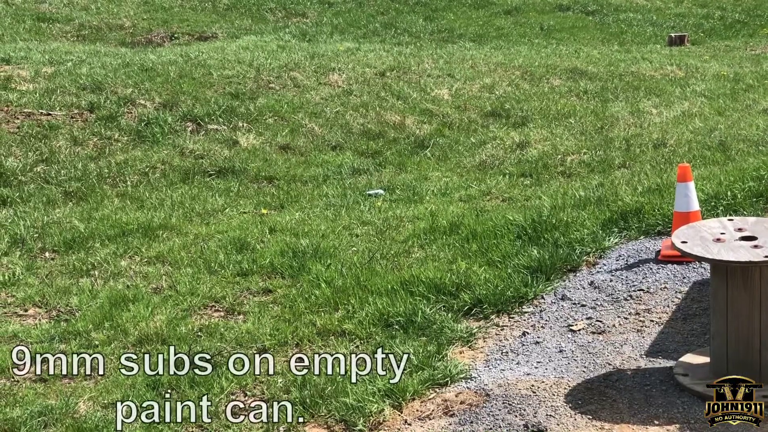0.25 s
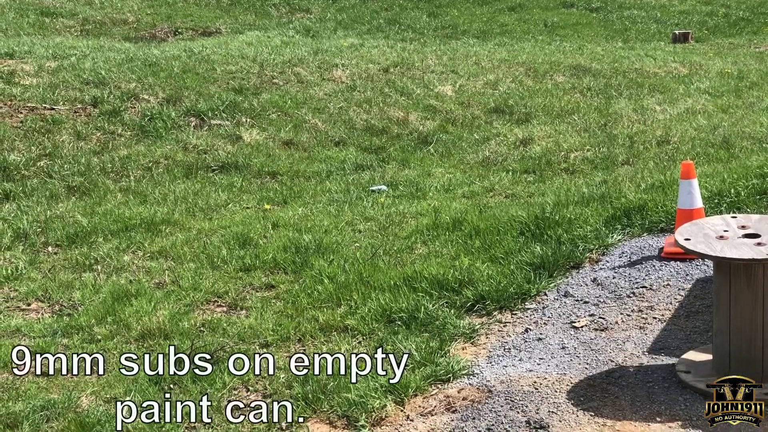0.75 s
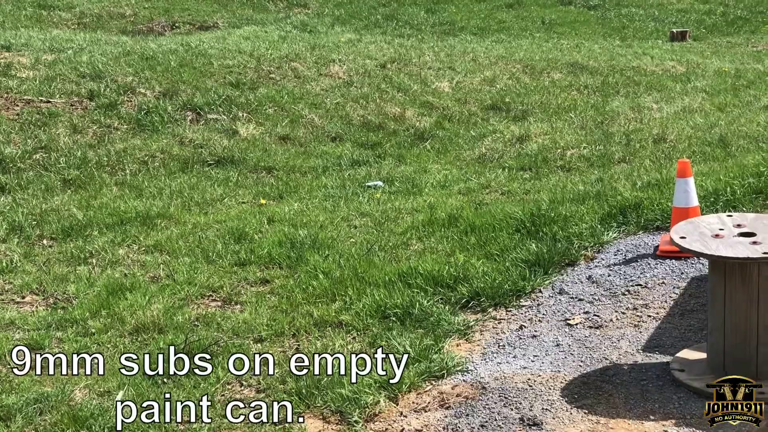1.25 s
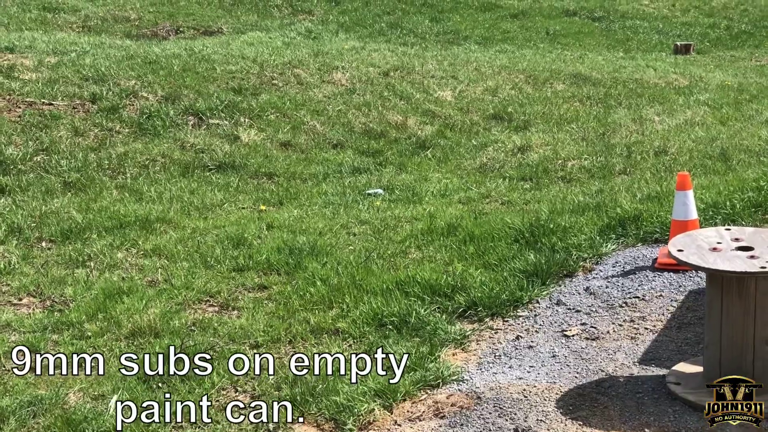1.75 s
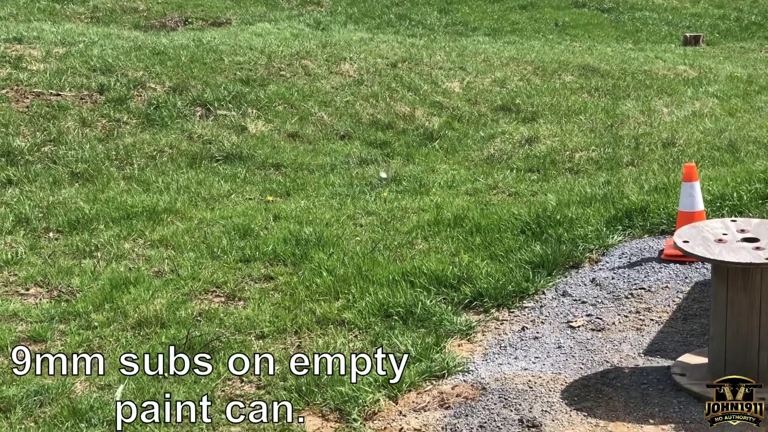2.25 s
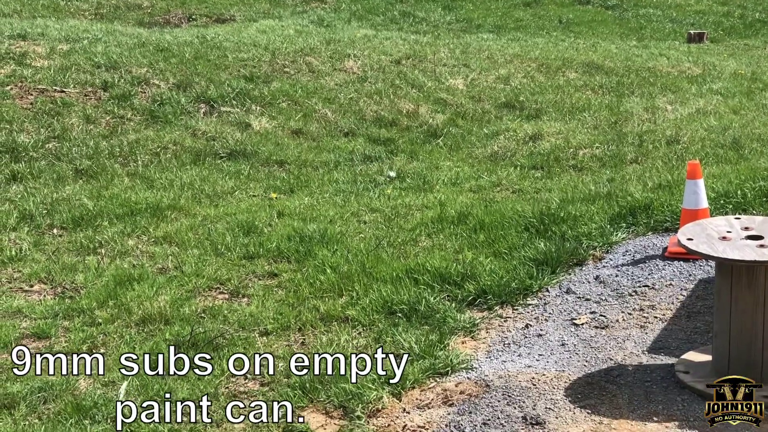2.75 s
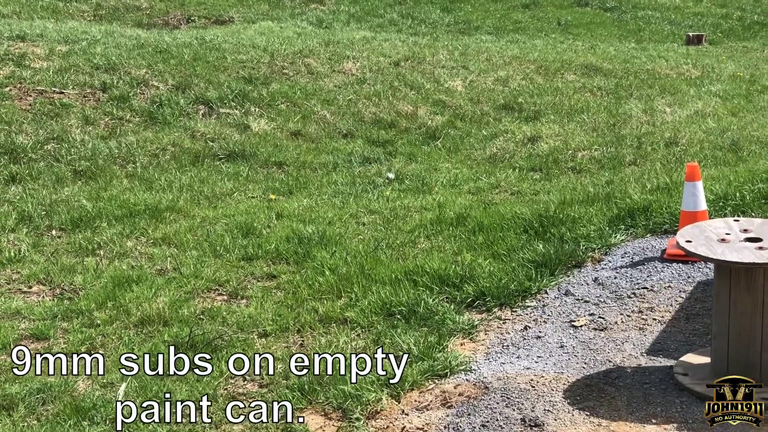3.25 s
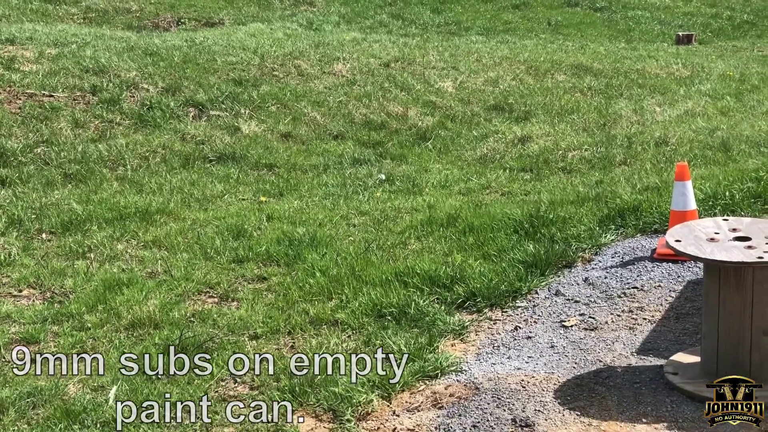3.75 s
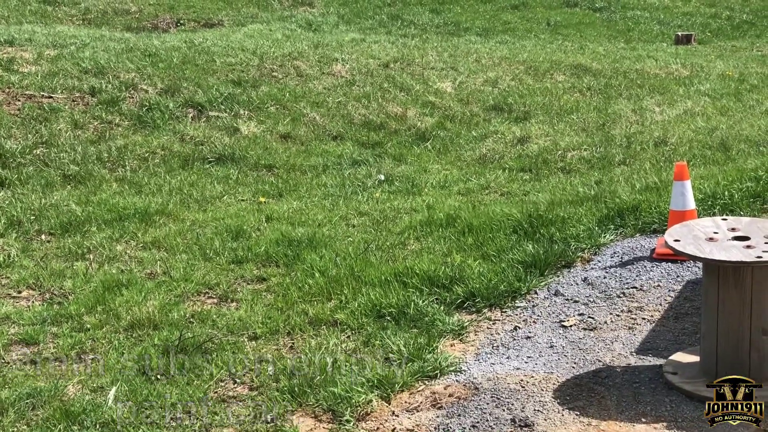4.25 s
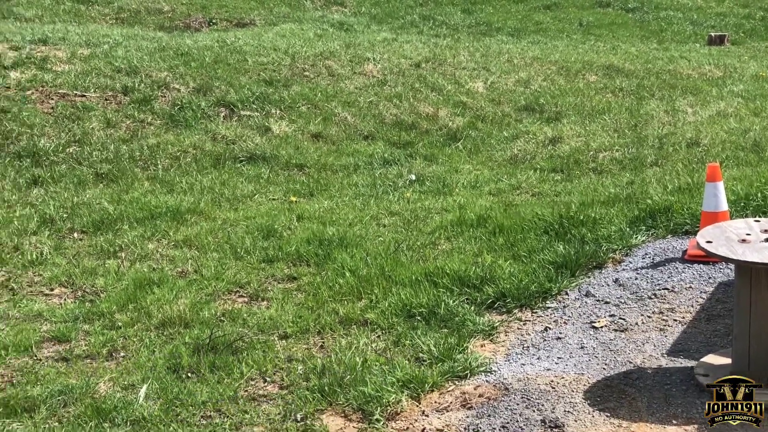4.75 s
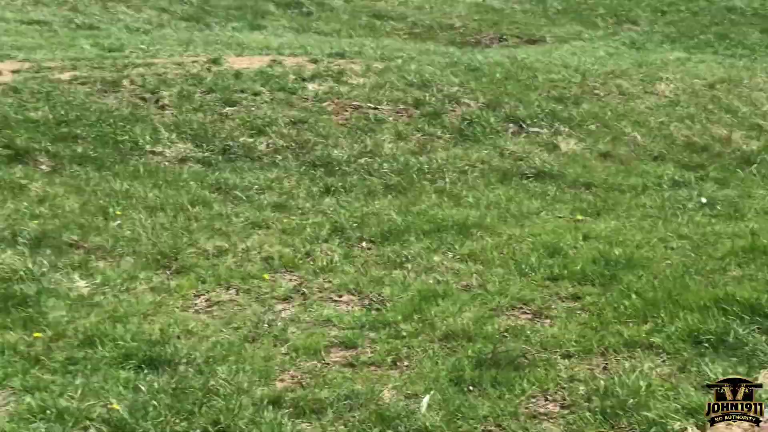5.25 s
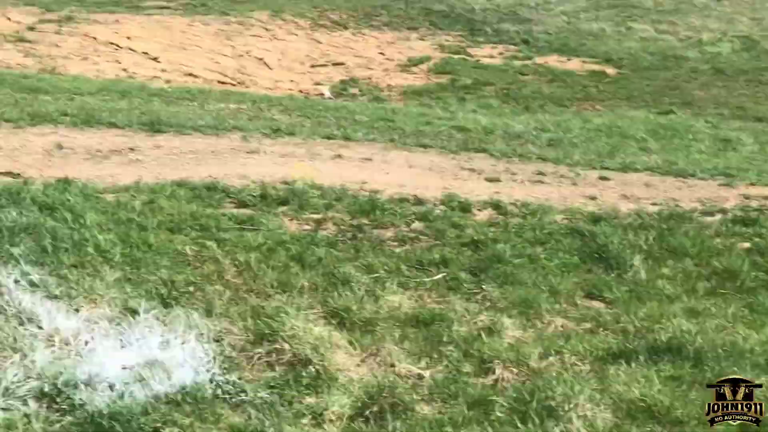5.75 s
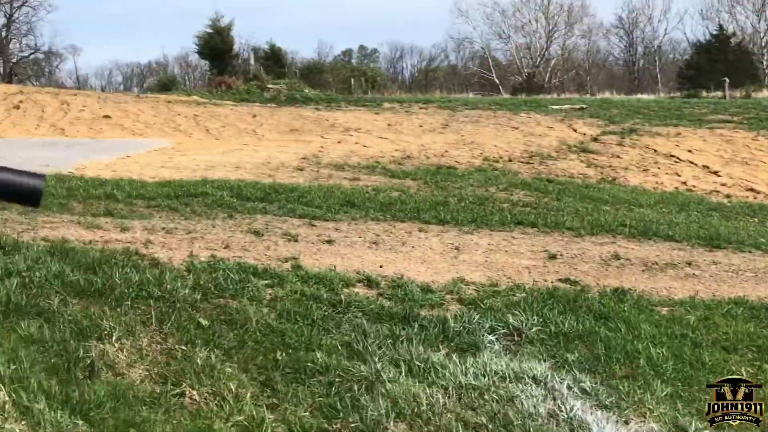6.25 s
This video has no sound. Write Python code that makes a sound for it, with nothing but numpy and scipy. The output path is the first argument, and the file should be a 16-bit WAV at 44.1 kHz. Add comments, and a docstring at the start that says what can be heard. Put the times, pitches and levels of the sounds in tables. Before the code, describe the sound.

Open field, handheld microphone in gusty wind. Five suppressed gunshots, well over a second apart, snap dry and mechanical, each with a soft dirt slap about a fifth of a second later and faint return from a slope. Between them come distant bird whistles, a falling trill, a tinkling cartridge case on gravel and very faint leaf hiss. Wind buffeting becomes loud and popping before the last shot.

```python
"""A suppressed carbine fires at once, over wind and a faint hiss, and cycles five times in all: sear, hammer,
muzzle puff, bolt travel, as bursts of resonant noise. Each bullet slaps the ground; a thin echo returns off the berm.
A brass case skips over gravel (noise bursts, a sine when it rings); a sparrow whistles and trills (swept sines).
Gusty wind buffets and pops at the microphone port; behind it leaves hiss, a drone pulses and a soft rush passes."""
import sys
import numpy as np
from scipy import signal
from scipy.fft import rfft, irfft, next_fast_len
from scipy.io import wavfile
from scipy.ndimage import uniform_filter1d, map_coordinates

SR = 44100
rng = np.random.default_rng(int(sys.argv[2]) if len(sys.argv) > 2 else 0)


def int16_out(signal):
    """Quantize to a 16-bit WAV file."""
    q = np.round(np.clip(np.atleast_2d(signal).T, -1, 1) * 32767)
    wavfile.write(sys.argv[1], SR, q.astype(np.int16))


N = 287091
T = np.arange(N) / SR

# shots: t/s, echo level/dB, body knock/dB
SHOTS = [(0.0221, -0.5, 2), (1.9347, -1.5, -1), (3.3129, -3.5, -0.5), (4.9028, -4, -1), (6.2119, -12, 2.5)]
# contacts of one firing cycle: t from shot/s, level/dB, hold/s, t60/s, knock re contact/dB
CYCLE_CONTACTS = [(-.024, -39.5, 0.001, 0.008, -9.5), (-.021, -31, .001, .008, -20),
                  (-.015, -36.5, 0.0014, 0.01, -17), (-.0087, -22.5, .001, 0.0089, -11.5),
                  (-.0008, -8.5, 0.0015, .012, -5), (.0022, -10, 0.002, 0.0081, -13.5),
                  (.0075, -21, .0015, 0.025, -14), (0.035, -36.5, .004, .04, -12),
                  (0.063, -20.5, .0006, 0.011, -35), (0.075, -33, 0.0019, .03, 1.5)]
# bolt scrape: t from shot/s, level/dB
BOLT_SCRAPE = [(-.024, -50), (0.012, -37.5), (0.039, -29), (0.06, -33), (.069, -37), (.101, -43),
               (0.109, -48), (.15, -60), (.25, -102)]
# jolt of the stock at the first shot: t/s, level/dB
FIRST_THUMP = (0.02, -18)
# receiver resonances: f/Hz, width/Hz, level/dB
STEEL_PEAKS = [(5860, 1800, 8.5), (11200, 5000, -3.5), (15100, 13000, 6), (4592, 1100, -3)]
# ringing receiver modes: f/Hz, level/dB
RECEIVER_MODES = [(5750, -1), (6500, 0)]
# stock and barrel resonances: f/Hz, width/Hz, level/dB
BODY_PEAKS = [(930, 910, 6), (1740, 1800, 3), (3130, 2000, -3.5)]
# far echo off the berm: t from shot/s, level before each shot's echo level/dB
BERM_ECHO = [(.12, -76), (.18, -61), (.23, -59), (0.42, -72), (.66, -87.5)]
# echo resonances before treble loss: f/Hz, width/Hz, level/dB
BERM_PEAKS = [(5450, 820, 2), (3630, 1300, -4), (7300, 1100, -8), (1900, 1500, -9.5)]
# bullets hitting the ground: t/s, level/dB
BULLET_SLAPS = [(0.193, -33), (2.0923, -35), (3.4537, -38), (5.055, -35.5), (6.347, -33)]
# soil spectrum: f/Hz, level/dB
SOIL_SPECTRUM = [(400, 5.5), (900, 1.5), (4900, -6.5), (16500, -11.5)]
# case bounces on gravel: t/s, level/dB, t60 of the crisp part/s
CASE_BOUNCES = [(2.3977, -40, 0.069), (2.41, -35.5, 0.05), (2.441, -46, 0.059), (2.5368, -44.5, 0.083),
                (2.628, -55, 0.082), (2.691, -55.5, 0.041), (2.9974, -71, 0.07), (4.3507, -78, 0.06),
                (5.5488, -68.5, 0.067)]
# gravel spectrum: f/Hz, level/dB
GRAVEL_SPECTRUM = [(600, -3), (2800, -1.5), (9000, -6), (16500, -5)]
# brass ringing out: t/s, level/dB, t60/s
BRASS_RINGS = [(2.54, -69.5, 0.42), (2.635, -78, 0.54), (4.352, -71.5, 0.148)]
# sparrow whistles: t/s, length/s, start f/Hz, end f/Hz, level/dB
WHISTLES = [(0.612, 0.21, 4040, 3810, -75), (0.85, 0.17, 4190, 3900, -69.5),
            (1.103, 0.18, 4200, 3910, -67.5)]
# sparrow trill: start t/s, beat/s, note length/s, start f/Hz, end f/Hz, level/dB
TRILL = (1.272, .0476, .04, 4130, 3310, -64.5)
# breeze before gusts and dips: t/s, buffeting level/dB, flutter re buffeting/dB
BREEZE = [(0, -33, -5.5), (.3, -42, -14), (.7, -31, -20), (.84, -35, -20), (1.12, -22, -15.5),
          (1.6, -24.5, -13), (1.93, -30, -11), (2.15, -28.5, -10.5), (2.6, -29.5, -8.5), (2.95, -28.5, -16),
          (3.3, -32, -18), (3.8, -36, -20), (4.24, -37, -18.5), (4.6, -29, -14), (5.3, -32.5, -23.5),
          (5.57, -27.5, -7.5), (5.66, -23.5, -4.5), (5.72, -18.5, -1.5), (6.1, -14.5, -14.5),
          (6.3, -17, -5), (6.51, -18, -8)]
# gusts riding on the breeze: t/s, half width at 1/e of the rise/s, rise/dB
GUSTS = [(0.905, 0.034, 14.5), (0.992, 0.018, 7), (1.053, 0.013, 9.5), (1.227, 0.023, 11),
         (1.383, 0.06, 10), (1.78, 0.07, 4), (2.201, 0.031, 5), (2.326, 0.055, 11.5), (3.589, 0.08, 11),
         (4.67, 0.014, 8), (4.83, 0.048, 11), (5.27, 0.03, 9.5), (6.469, 0.0082, 8)]
# loudest eddies slapping the port: t/s, level/dB
EDDIES = [(0.91, -36), (0.97, -37), (1.045, -32.5), (1.204, -37), (1.228, -24.5), (1.338, -31),
          (1.368, -27), (1.391, -40), (1.417, -31), (1.432, -24), (1.871, -25), (2.193, -28.5),
          (2.223, -31.5), (2.302, -21.5), (2.335, -38), (2.361, -31), (2.496, -29), (2.589, -32),
          (2.622, -32.5), (2.673, -27), (2.722, -30.5), (2.832, -32), (2.921, -29), (3.046, -31.5),
          (4.336, -37), (4.845, -30.5), (5.6, -23.5), (5.627, -23), (5.697, -19.5), (5.709, -26),
          (5.728, -27), (5.743, -22), (5.78, -22.5), (5.792, -24.5), (5.871, -21.5), (5.895, -19),
          (5.926, -14), (5.95, -21), (5.975, -21.5), (6.003, -11), (6.019, -16), (6.031, -14),
          (6.062, -21.5), (6.092, -14.5), (6.109, -13.5), (6.119, -8), (6.159, -37), (6.333, -18.5),
          (6.362, -20.5), (6.379, -18.5), (6.401, -20), (6.432, -26), (6.452, -27), (6.47, -19.5)]
# wind spectra, slow buffeting, flutter and slaps: f/Hz, level/dB
BUFFET_SPECTRUM = [(12, -51.5), (48, -1.5), (110, 4), (250, -3), (500, -17), (1200, -73)]
FLUTTER_SPECTRUM = [(120, -25.5), (300, 0.5), (600, -4.5), (1200, -23), (2500, -53), (8000, -110)]
SLAP_SPECTRUM = [(100, -5.5), (400, -14), (1000, 0), (2000, -18.5), (4000, -41.5), (12000, -110)]
# leaf hiss spectrum: f/Hz, level/dB
HISS_SPECTRUM = [(500, -26), (1000, -6), (2500, -18), (5000, -25), (9000, -35), (16500, -47.5)]
# soft far rush: t/s, level/dB
RUSH = (3.9, -70)

RING_WIDTH_HZ, BRASS_HZ = 300, 10330
ECHO_TREBLE_LOSS_HZ = 9000  # treble lost on the way
SHIMMER_DB, SHIMMER_T60_S = -59, 0.48  # echo treble, before each shot's echo level
SLAP_ECHO_S, SLAP_ECHO_DB = 0.3, -28  # delay, level re slap
EDDY_SHARPENS = 0.2  # dB shorter per dB louder
GUST_BRIGHTENS = 0.17  # extra flutter dB per dB of gust
DIP_DB, DIP_FALL_S, DIP_RECOVER_S = 10, 0.073, 0.63  # nominal depth and time constants
HISS_DB, HISS_DIP_RATIO = -65.5, 0.9  # level before dips, dip dB per dB of wind dip
DRONE_DB, DRONE_DIP_RATIO = -61.5, 2.4
DRONE_HZ = 1580
BAND_LIMIT_HZ, BAND_ROLLOFF_HZ = 16500, 900


def amp(db):
    """Amplitude ratio of a level in dB."""
    return 10 ** (np.asarray(db) / 20)


def unit(x):
    """Scale to rms 1."""
    return x / np.sqrt(np.mean(x ** 2) + 1e-20)


def curves(rows, t=T):
    """Interpolate each column after the time, one value per sample."""
    times_s, *columns = np.transpose(rows)
    return [np.interp(t, times_s, column) for column in columns]


def wobble(rate_hz):
    """Smooth random curve through rate_hz knots a second."""
    knots = rng.standard_normal(int(N * rate_hz / SR) + 4)
    return map_coordinates(knots, [T * rate_hz])


def noise(gain):
    """Noise of rms 1 shaped by a gain over frequency."""
    m = next_fast_len(N)
    spectrum_bins = rfft(rng.standard_normal(m)) * gain(np.fft.rfftfreq(m, 1 / SR))
    return unit(irfft(spectrum_bins, m)[:N])


def spectrum(points):
    """Gain through (f/Hz, level/dB) points on a log axis."""
    point_hz, db = np.transpose(points)
    return lambda hz: amp(np.interp(np.log(hz + 1), np.log(point_hz + 1), db))


def peaks(rows):
    """Gain of resonances whose powers add."""
    def power(f, centre, width, db):
        damping = (f * width) ** 2
        return amp(2 * db) * damping / ((centre * centre - f * f) ** 2 + damping)

    return lambda f: np.sqrt(sum(power(f, *row) for row in rows))


def patchy(x, patchy_db):
    """Random gain patches over time and frequency, so that no band sits still."""
    bins = signal.stft(x, nperseg=256)[2]
    patches = uniform_filter1d(rng.standard_normal(bins.shape), size=6, axis=0)
    patches = uniform_filter1d(patches, size=6, axis=1)
    return signal.istft(bins * amp(patchy_db * unit(patches)), nperseg=256)[1][:N]


def burst(start_s, hold_s, t60_s, rise_s):
    """Envelope that rises at start_s, holds and dies away exponentially."""
    out = np.zeros(N)
    first = max(int(start_s * SR) + 1, 0)
    t = T[first:first + int((hold_s + 2 * t60_s) * SR)] - start_s
    decay = amp(-60 * np.maximum(t - hold_s, 0) / t60_s)
    out[first:first + len(t)] = (1 - np.exp(-t / rise_s)) * decay
    return out


def gun():
    """Each shot repeats one cycle of contacts over the bolt scrape, exciting receiver, body, berm and dirt."""
    bright, knock, echo, shimmer = np.zeros((4, N))
    rattle = amp(1.8 * wobble(260))  # loose parts make the scrape uneven
    for shot_s, echo_db, body_db in SHOTS:
        t = T - shot_s
        scraping = (t > BOLT_SCRAPE[0][0]) * (t < BOLT_SCRAPE[-1][0])
        scrape = scraping * amp(curves(BOLT_SCRAPE, t)[0]) * rattle
        bright += scrape
        knock += amp(-7.0) * scrape
        for lag_s, level_db, hold_s, t60_s, knock_db in CYCLE_CONTACTS:
            level_db = level_db + rng.normal(0, 0.42)
            hit = amp(level_db) * burst(shot_s + lag_s, hold_s, t60_s, rise_s=0.00025)
            bright += hit
            knock += amp(knock_db + body_db) * hit
        echo += (t > 0) * (t < BERM_ECHO[-1][0]) * amp(echo_db + curves(BERM_ECHO, t)[0])
        shimmer += amp(SHIMMER_DB + echo_db) * burst(shot_s + 0.1, 0, SHIMMER_T60_S, rise_s=0.03)

    clatter = bright * patchy(noise(peaks(STEEL_PEAKS)), patchy_db=2)
    ringing = np.zeros(N)
    for hz, db in RECEIVER_MODES:
        ringing += amp(db) * signal.lfilter(*signal.iirpeak(hz, hz / RING_WIDTH_HZ, SR), clatter)
    body = knock * patchy(noise(peaks(BODY_PEAKS)), patchy_db=3)
    thump_s, thump_db = FIRST_THUMP
    thump = amp(thump_db) * np.exp(-((T - thump_s) / 0.0071) ** 2)
    thump = thump * noise(peaks([(520, 350, -0.088), (1260, 350, -0.91)]))

    scatter = amp(1.4 * wobble(40) + 1.4 * wobble(11))  # uneven slope returns the echo in lumps
    berm_noise = noise(lambda hz: peaks(BERM_PEAKS)(hz) / (1 + (hz / ECHO_TREBLE_LOSS_HZ) ** 3))
    berm = scatter * echo * patchy(berm_noise, patchy_db=1.3)
    debris = np.maximum(wobble(130) - 0.8, 0)  # dirt thrown up by the shots falls back in dull ticks
    ticks = echo * debris * noise(peaks([(1500, 1800, 3)]))  # they swell and fade along with the echo
    treble = shimmer * noise(lambda hz: peaks([(8500, 6000, 0)])(hz) ** 2)
    return clatter + ringing + body + thump + berm + ticks + treble


def bullets():
    """Ground impact as a dry slap and spray of soil, heard once more off the berm near 4.5 kHz."""
    slap, back = np.zeros((2, N))
    for s, db in BULLET_SLAPS:
        slap += amp(db) * burst(s - 0.001, 0.0032, 0.042, rise_s=0.00089)
        back += amp(db + SLAP_ECHO_DB) * burst(s + SLAP_ECHO_S, 0.0048, 0.098, rise_s=0.0023)
    soil = slap * amp(6.4 * wobble(400)) * noise(spectrum(SOIL_SPECTRUM))
    return soil + back * noise(lambda hz: peaks([(4500, 5000, 0)])(hz) ** 3)


def case():
    """Each bounce crunches gravel, whose dull part lasts longer; the brass rings now and then."""
    crisp, dull, ring = np.zeros((3, N))
    for s, db, t60_s in CASE_BOUNCES:
        crisp += amp(db) * burst(s - 0.001, 0.0015, t60_s, rise_s=0.0004)
        dull += amp(db) * burst(s, 0.0037, 2.47 * t60_s, rise_s=0.002)
    for s, db, t60_s in BRASS_RINGS:
        ring += amp(db) * burst(s, 0, t60_s, rise_s=0.002)
    crunch = crisp * patchy(noise(spectrum(GRAVEL_SPECTRUM)), patchy_db=1)
    crunch = crunch + dull * noise(peaks([(2290, 3100, 0)]))
    return amp(1.1 * wobble(670)) * crunch + ring * np.sin(2 * np.pi * BRASS_HZ * T)


def sparrow():
    """Whistles drop and level out; trill sweeps fall steeply, weight moving upward; trees smear both."""
    start_s, beat_s, *trill_note = TRILL
    # bend: pitch curve exponent; late: above 1 puts the loudest point late in the note
    notes = [(*row, 5.5, 0.45) for row in WHISTLES]
    for k in range(14):
        note_s = start_s + k * beat_s + rng.normal(0, 0.0049)
        notes.append((note_s, *trill_note, 1.1, 2.1 - 0.115 * k))
    song = np.zeros(N)
    for s, length_s, start_hz, end_hz, db, bend, late in notes:
        u = np.linspace(0, 1, int(length_s * SR))
        hz = end_hz + (start_hz - end_hz) * (1 - u) ** bend
        tone = np.sin(2 * np.pi * np.cumsum(hz) / SR)
        song[int(s * SR):][:len(u)] += amp(db) * np.sin(np.pi * u ** late) * tone
    t = T[:SR // 2]
    trees = rng.standard_normal(len(t)) * amp(-60 * t / 0.4)  # t60 0.4 s
    smeared = signal.fftconvolve(song, trees / np.linalg.norm(trees))[:N]
    return song * amp(3.2 * wobble(70)) + amp(-1.5) * smeared


def wind():
    """Slow eddies push the diaphragm; quick ones pop at the port, brighter the harder they hit."""
    breeze_db, flutter_db = curves(BREEZE)
    gust_db = sum(db * np.exp(-((T - s) / width_s) ** 2) for s, width_s, db in GUSTS)
    buffet_db = breeze_db + dip() + gust_db
    quick = 2 * np.tanh(wobble(45) / 2)
    rumble = amp(1.9 * quick + 2.2 * wobble(16)) * noise(spectrum(BUFFET_SPECTRUM))
    low = amp(buffet_db) * unit(rumble)
    pops = unit(amp(2.8 * quick + 4 * np.tanh(wobble(190))))
    pops = pops * amp(buffet_db + flutter_db + GUST_BRIGHTENS * gust_db)
    for s, db in EDDIES:
        near = slice(int((s - 0.02) * SR), int((s + 0.02) * SR))
        width_s = 0.0035 * amp(-EDDY_SHARPENS * (db + 22))
        pops[near] += amp(db) * np.exp(-((T[near] - s - 0.002) / width_s) ** 2)
    flutter = pops * noise(spectrum(FLUTTER_SPECTRUM))
    slaps = pops ** 1.588 * noise(spectrum(SLAP_SPECTRUM))  # grows faster than the flutter
    spray_db = uniform_filter1d(buffet_db, SR // 4) - 58.5 + 1.5 * quick
    spray = amp(spray_db) * rng.standard_normal(N)  # faint hiss of fast air
    return low + flutter + slaps + spray


def field():
    """Far leaves hiss; a narrow drone pulses quickly and slows a little; a soft rush passes near 2.3 kHz."""
    hiss_db = HISS_DB + HISS_DIP_RATIO * dip() + 0.49 * wobble(10)
    hiss = amp(hiss_db) * noise(spectrum(HISS_SPECTRUM))
    pulses_per_s = 48.7 - 1.15 * T
    pulses = np.sin(np.pi * np.cumsum(pulses_per_s) / SR) ** 3  # alternating sign
    drone_noise = noise(lambda hz: np.exp(-((hz - DRONE_HZ) / 90) ** 2))
    drone = pulses * (np.sin(2 * np.pi * DRONE_HZ * T) + 0.5 * drone_noise)
    rush_s, rush_db = RUSH
    rush = amp(rush_db) * burst(rush_s, 0.12, 0.7, rise_s=0.011)
    rush = rush * noise(lambda hz: np.exp(-((hz - 2250) / 420) ** 4))
    return hiss + amp(DRONE_DB + DRONE_DIP_RATIO * dip()) * drone + rush


def dip():
    """Sag of the background in dB: quick down after each shot, slow up."""
    t = np.clip(T[None] - np.array(SHOTS)[:, :1], 0, None)
    sag = (1 - np.exp(-t / DIP_FALL_S)) * np.exp(-(t / DIP_RECOVER_S) ** 1.2)
    return -DIP_DB * sag.max(axis=0)


def scene():
    """Sum of all sources, one channel."""
    return (gun() + bullets() + case() + sparrow() + wind() + field())[None]


def record(dry):
    """Peaks are softly clipped and nothing is kept above the band limit."""
    held = dry / (1 + np.abs(dry / 0.8) ** 6) ** (1 / 6)
    m = next_fast_len(N + SR)
    edge = np.clip((BAND_LIMIT_HZ - np.fft.rfftfreq(m, 1 / SR)) / BAND_ROLLOFF_HZ, 0, 1)
    return irfft(rfft(held, m) * np.sin(edge * np.pi / 2) ** 4, m)[:, :N]


dry = scene()
out = record(dry)
int16_out(out)
```